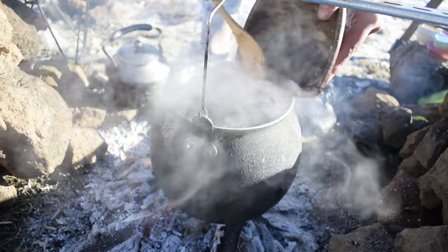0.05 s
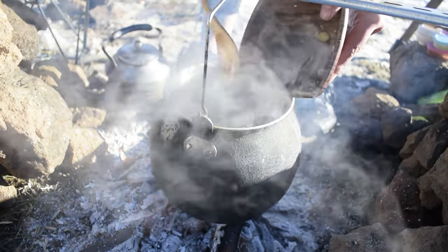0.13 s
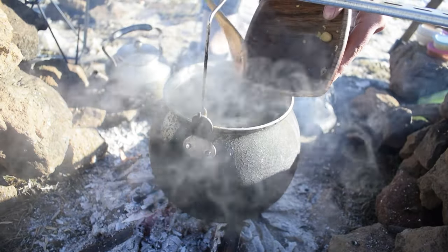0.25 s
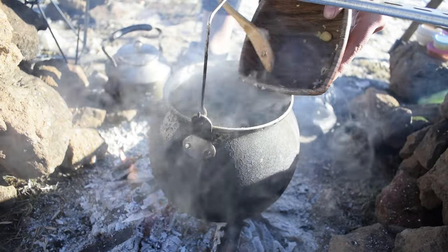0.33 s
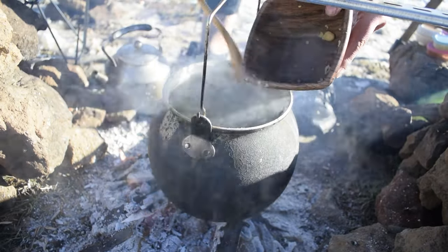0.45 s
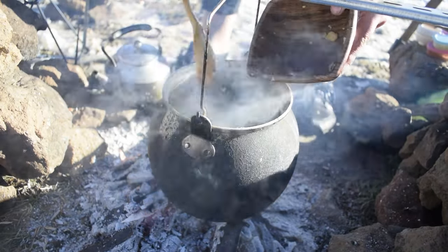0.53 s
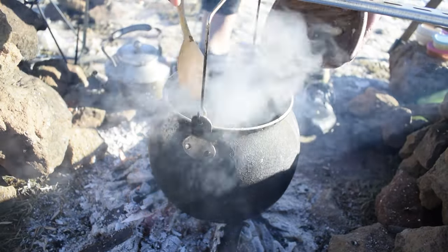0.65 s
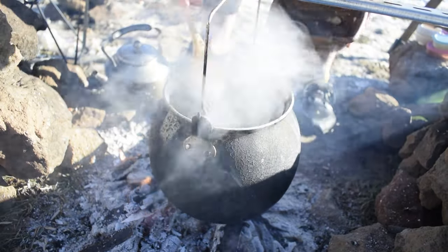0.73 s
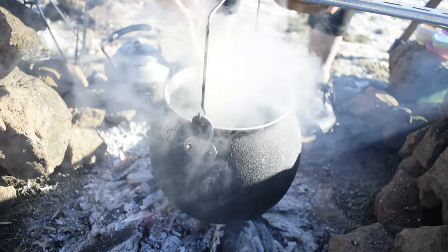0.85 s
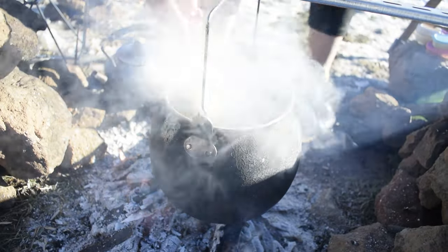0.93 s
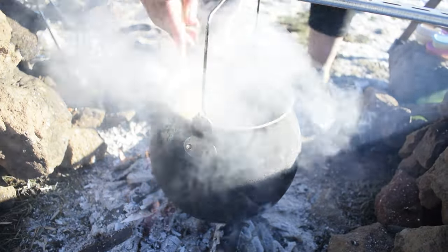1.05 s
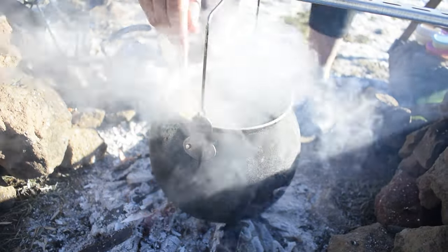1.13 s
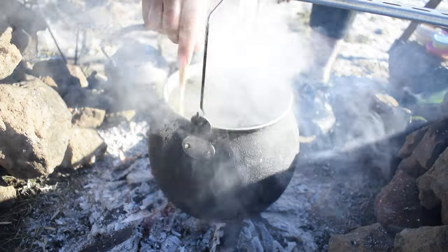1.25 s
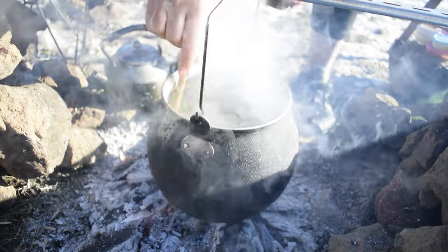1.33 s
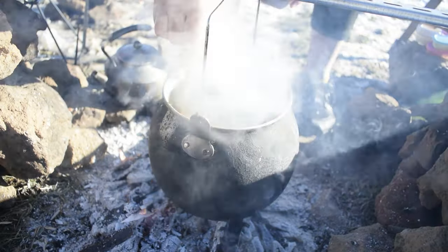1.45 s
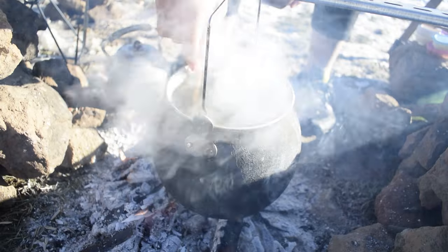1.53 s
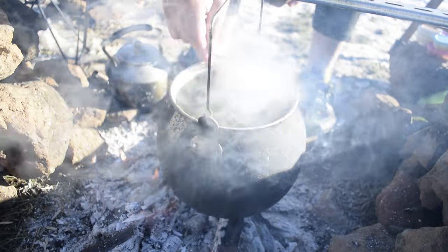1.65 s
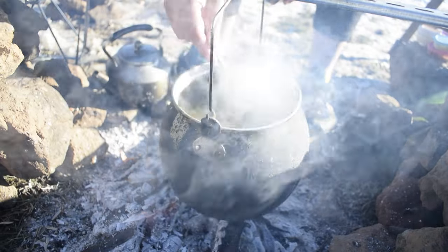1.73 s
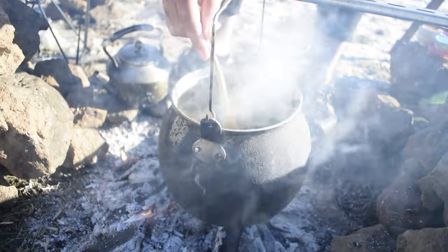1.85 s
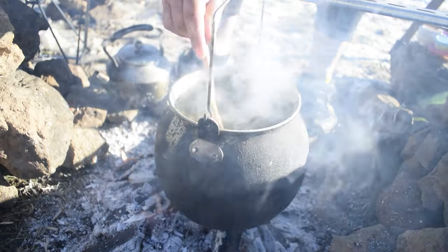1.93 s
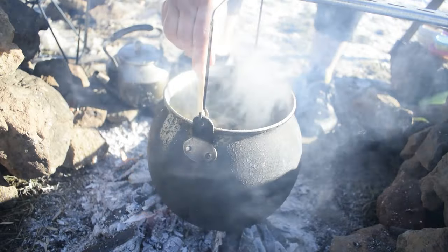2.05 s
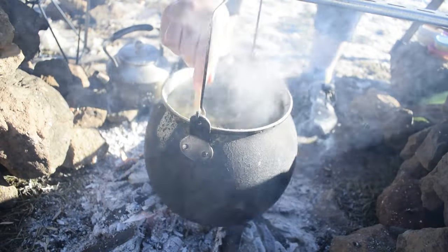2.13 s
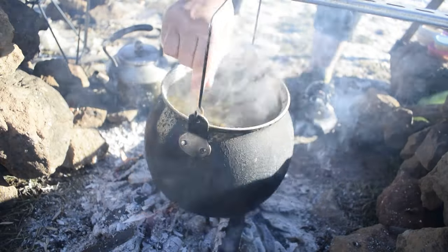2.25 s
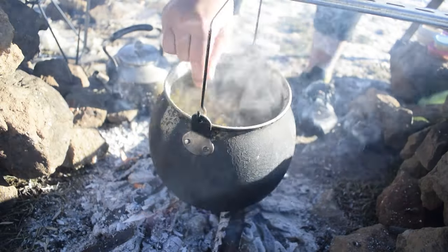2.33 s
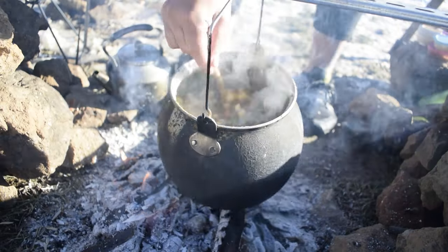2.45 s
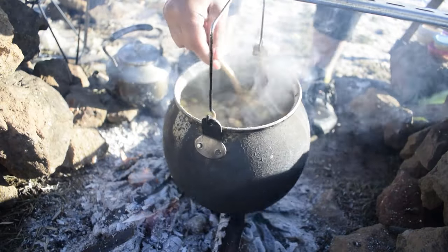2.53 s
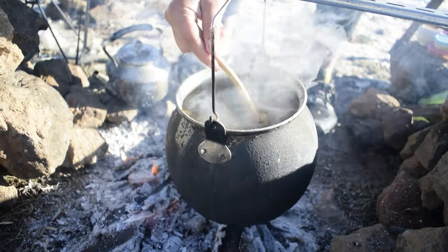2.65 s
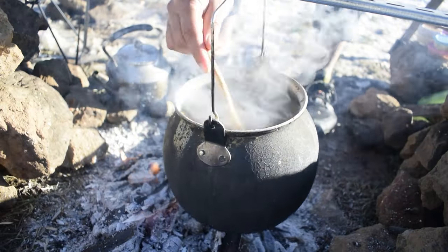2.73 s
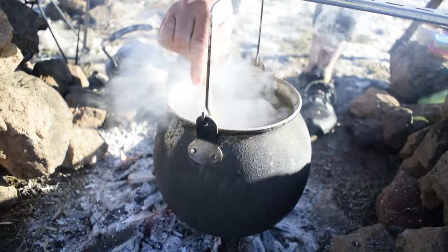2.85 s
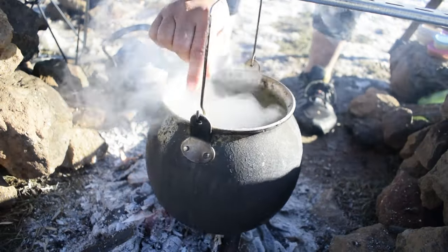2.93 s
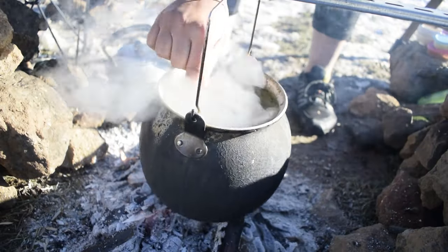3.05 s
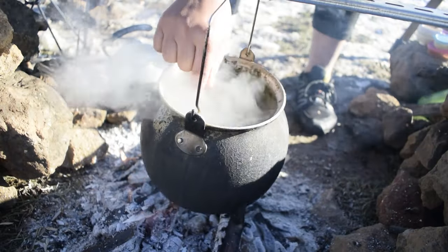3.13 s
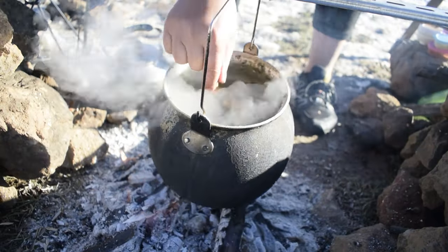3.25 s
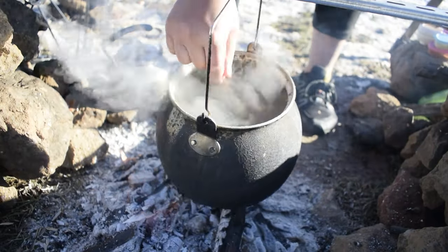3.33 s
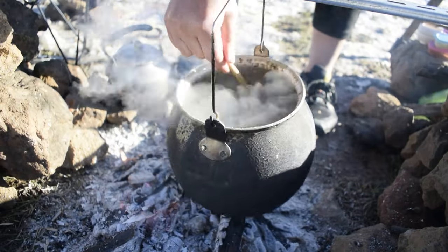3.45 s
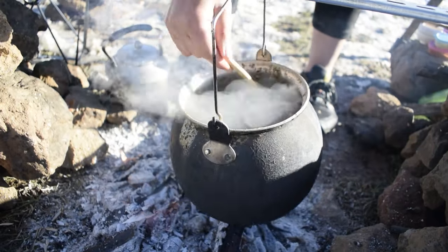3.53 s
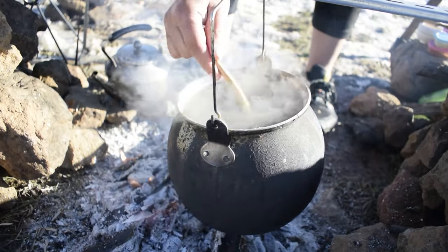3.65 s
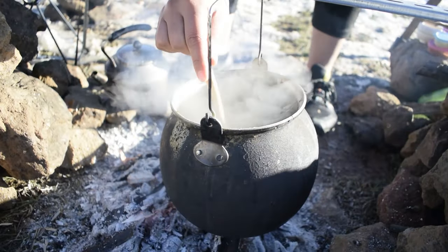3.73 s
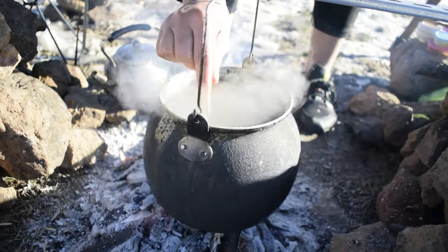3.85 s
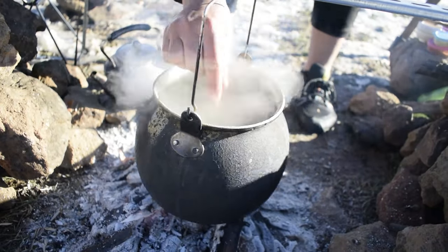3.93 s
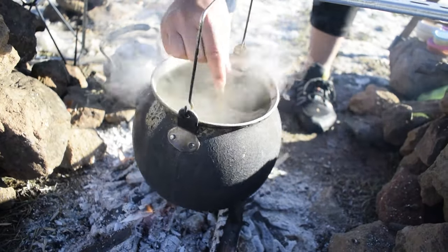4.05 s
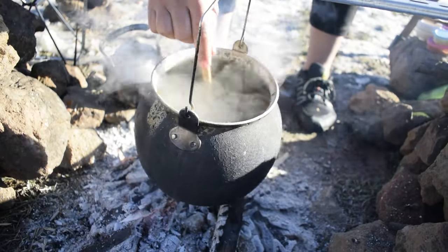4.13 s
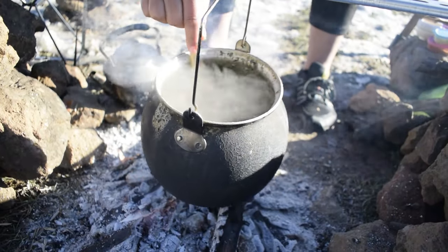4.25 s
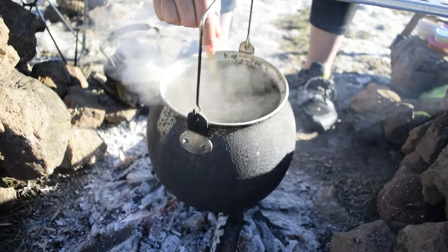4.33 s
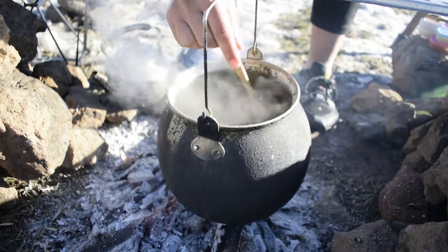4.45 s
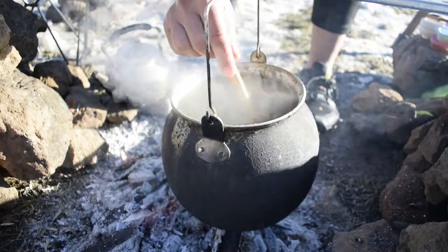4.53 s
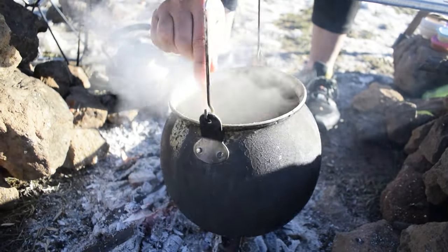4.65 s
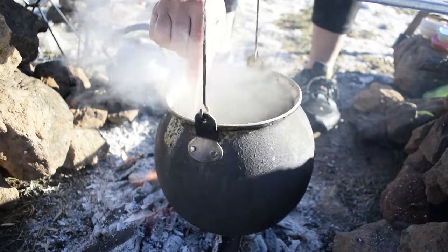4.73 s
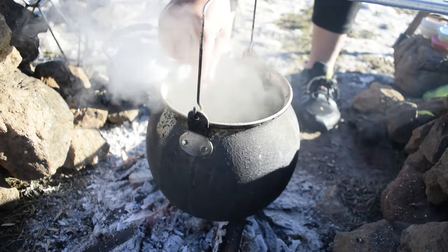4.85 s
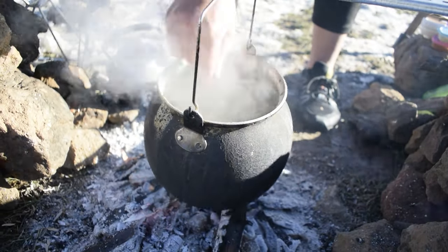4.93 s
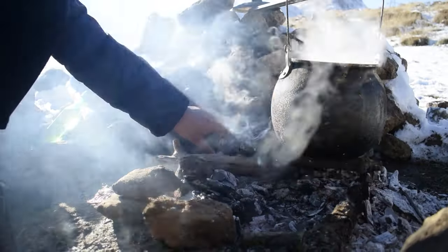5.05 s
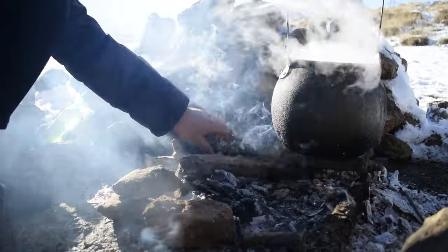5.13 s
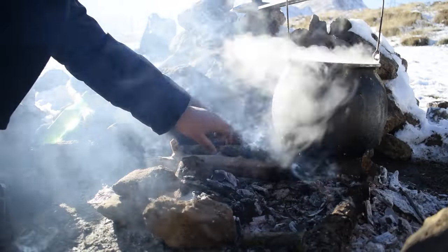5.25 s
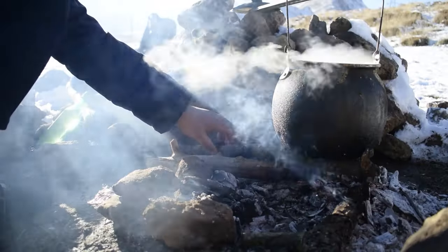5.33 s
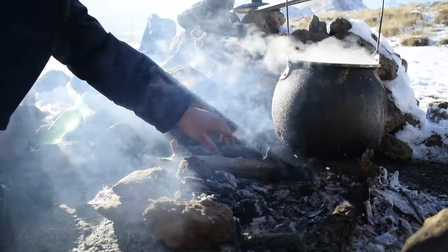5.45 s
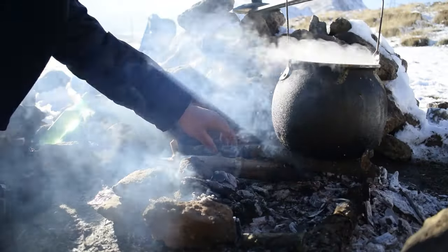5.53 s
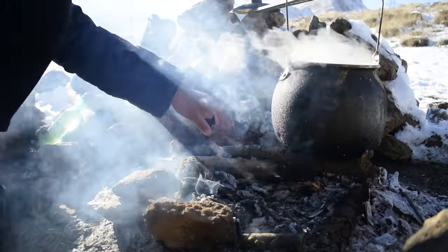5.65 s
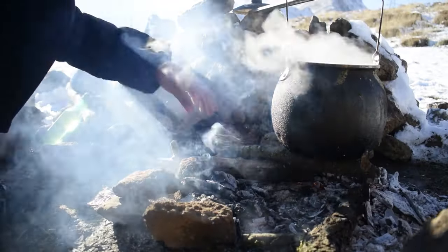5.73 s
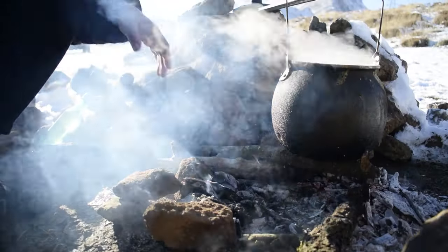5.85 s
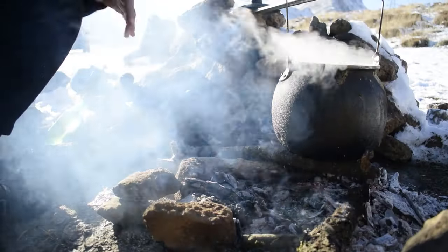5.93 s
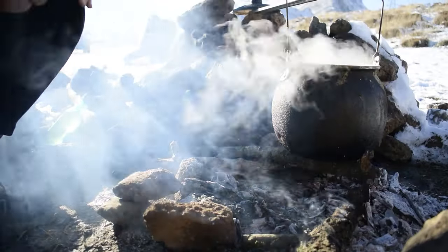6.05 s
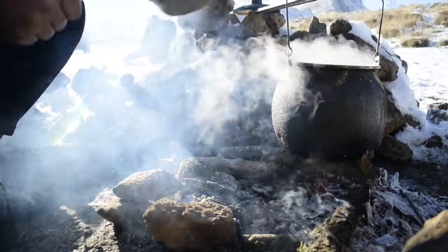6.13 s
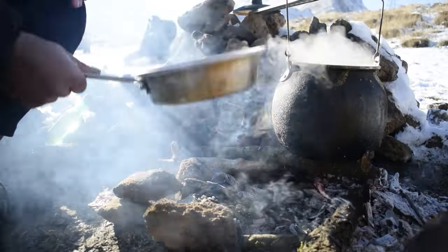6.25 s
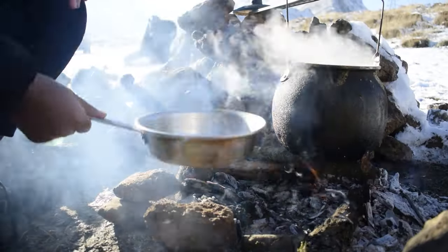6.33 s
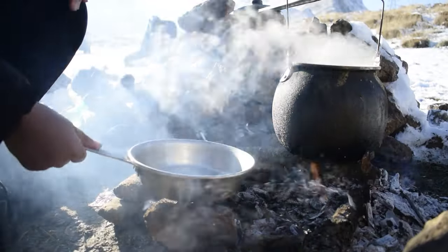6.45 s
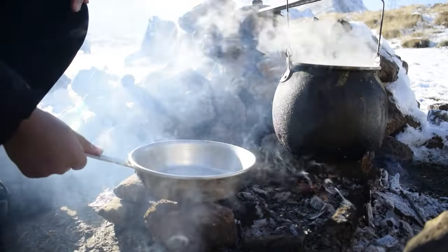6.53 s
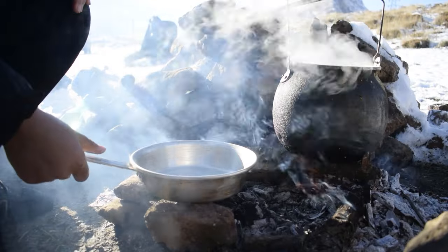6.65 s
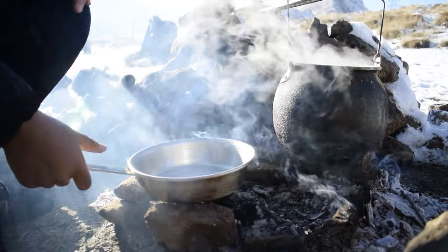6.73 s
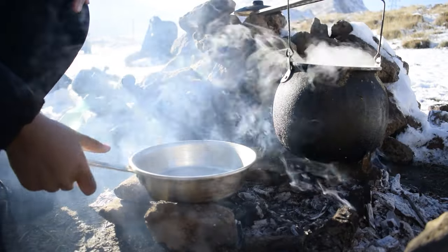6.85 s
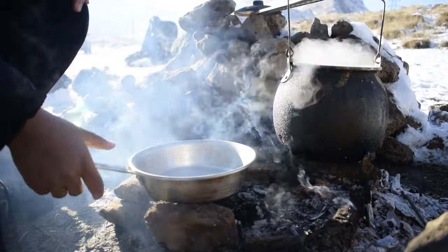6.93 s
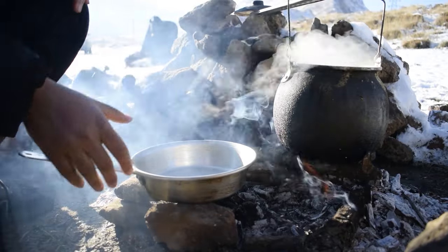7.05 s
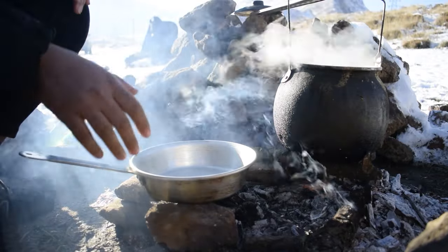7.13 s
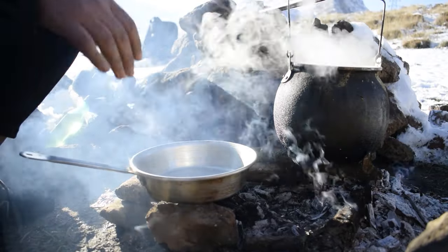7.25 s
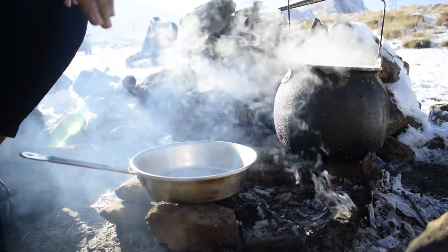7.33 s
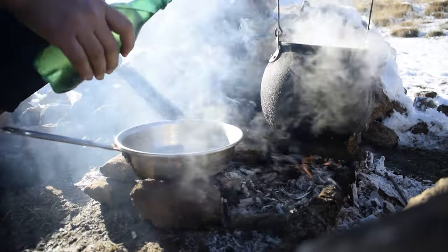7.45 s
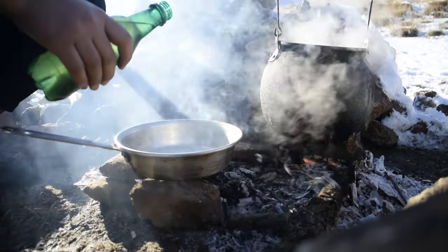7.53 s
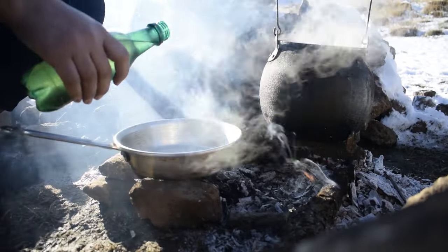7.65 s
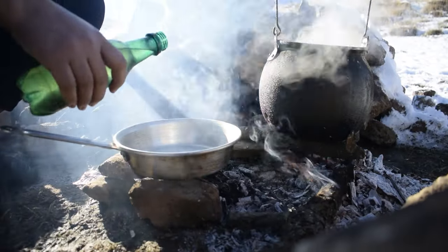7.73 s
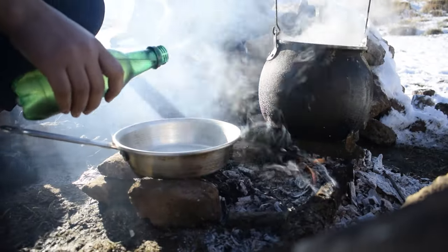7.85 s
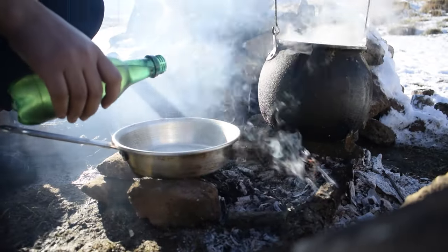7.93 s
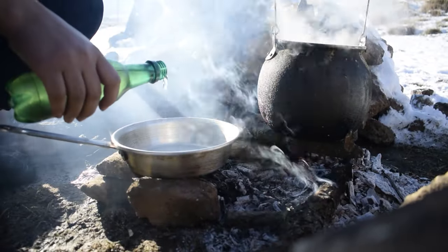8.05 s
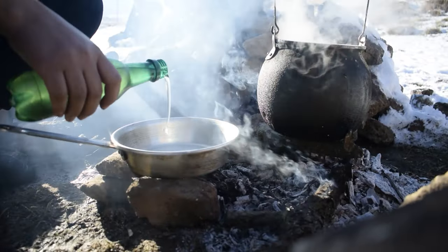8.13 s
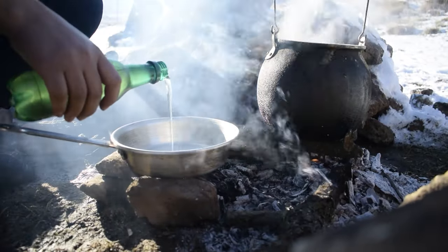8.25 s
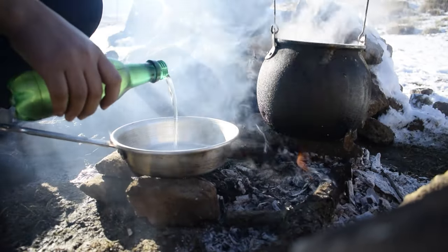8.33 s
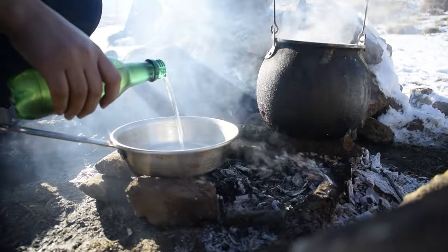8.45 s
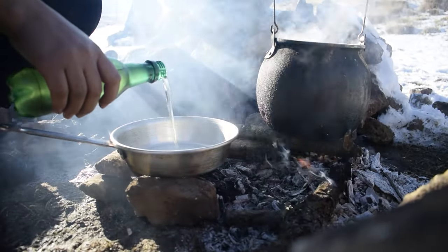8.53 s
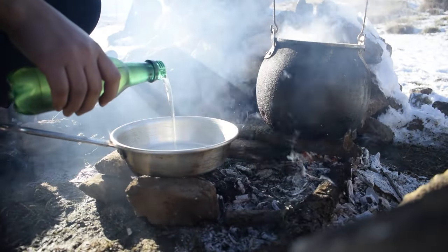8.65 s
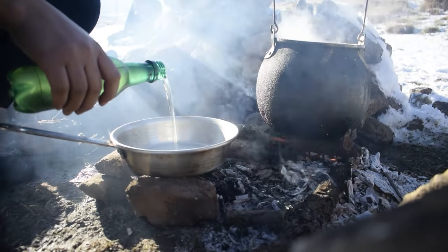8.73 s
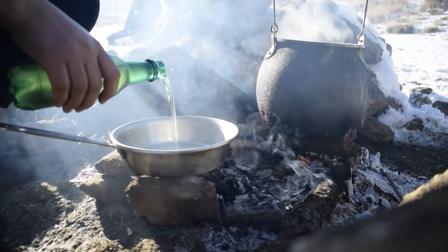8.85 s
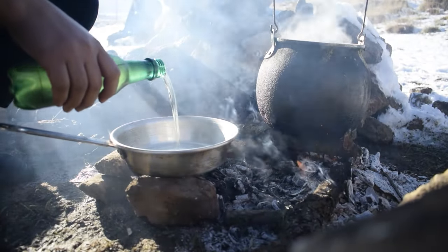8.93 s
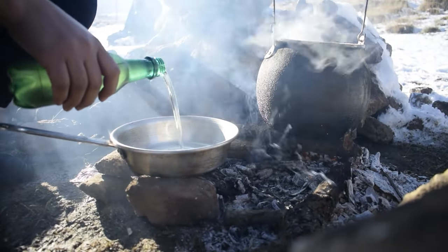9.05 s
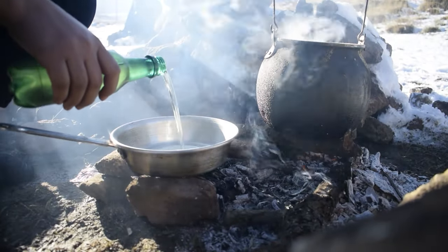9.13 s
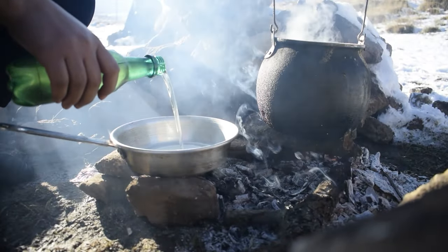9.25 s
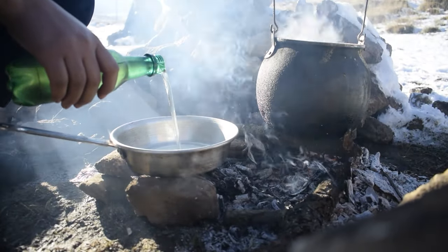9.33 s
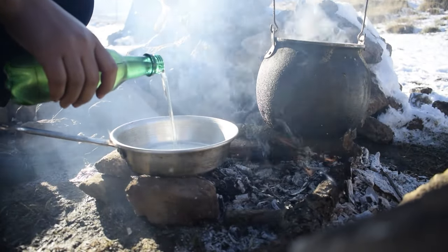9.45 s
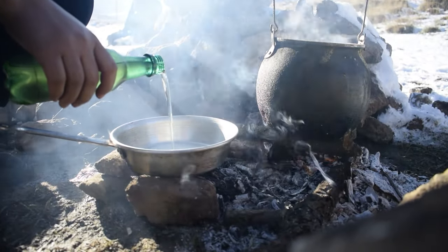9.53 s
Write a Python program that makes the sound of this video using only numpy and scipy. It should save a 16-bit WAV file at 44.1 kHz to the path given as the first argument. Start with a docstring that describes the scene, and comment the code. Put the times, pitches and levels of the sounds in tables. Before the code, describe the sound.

Hollow wooden knocks and scrapes open over a low, dense simmer and ember hiss. After quiet stirring comes a tiny double metal squeak, then a sharp spoon tap on the pot rim. Cloth swishes, and a pan lands with a bright ringing clank, shifts in smaller knocks and is damped. Fire flutter, dull pops and small rising blips remain. Open air, close microphone, central, dry, faint hiss.

```python
"""In the open, a pot of stew boils over a wood fire: bubbles are swelling, dying tones, flames low flutter,
embers hiss and noise snaps, over a rumble of wind and fire. A wooden spoon scrapes out a wooden bowl, hits
the rim and stirs, ringing each as a set of modes. The pot's bail squeaks on its hook by stick and slip, a
sleeve swishes, a thin pan is set on stones and rocks to rest, its ring damped by each touch, and oil lands
in it. Late on come short blips gliding upward. Loud blows pull the gain down."""
import sys
import numpy as np
from scipy import signal
from scipy.io import wavfile
from scipy.ndimage import uniform_filter1d

SR = 44100
rng = np.random.default_rng(int(sys.argv[2]) if len(sys.argv) > 2 else 0)


def persist_wave(psi):
    """Save psi, clipped to +-1, as 16-bit WAV."""
    counts = np.round(np.clip(psi, -1, 1) * 32767).astype(np.int16)
    wavfile.write(sys.argv[1], SR, np.atleast_2d(counts).T)


N = 423360


def from_db(db):
    """Decibels to gain."""
    return 10 ** (np.asarray(db) / 20)


def rms_one(x):
    """Scale to rms 1."""
    return x / np.sqrt(np.mean(x ** 2) + 1e-20)


def in_time(rows):
    """Each column after the time, as a value per sample."""
    s, *columns = np.transpose(rows)
    return [np.interp(np.arange(N) / SR, s, column) for column in columns]


def drift(rate):
    """Slow chance of rms 1, wandering about rate times a second."""
    step = 40   # samples between computed points
    r = np.exp(-2 * np.pi * rate * step / SR)
    white = rng.standard_normal(N // step + 2002)
    slow = signal.lfilter([1], [1, -2 * r, r * r], white)[2000:]
    return np.interp(np.arange(N) / step, np.arange(len(slow)), rms_one(slow))


def ring(clicks, hz, t60):
    """One resonance: a unit click sets a sine of height 1 ringing, 60 dB down after t60 seconds."""
    r = 1000 ** (-1 / (t60 * SR))
    w = 2 * np.pi * min(hz, SR / 2.2) / SR
    return signal.lfilter([0, np.sin(w)], [1, -2 * r * np.cos(w), r * r], clicks + 1e-18)


def clicks_at(seconds, db):
    """A click of the given level at each time."""
    out = np.zeros(N)
    out[np.round(np.array(seconds) * SR).astype(int)] = from_db(db)
    return out


def random_clicks(per_s, spread_db):
    """Clicks at random times with random signs, their levels in dB spread exponentially."""
    sizes = from_db(spread_db * np.minimum(rng.exponential(1, N), 5))
    signs = rng.choice([-1, 1], N)
    return sizes * signs * (rng.random(N) < per_s / SR)


def grains(per_s, low_hz, high_hz, cycles, spread_db, count=14):
    """Random clicks dealt to resonators spread in pitch, each ringing a few cycles; rms 1."""
    clicks, dealt = random_clicks(per_s, spread_db), rng.integers(0, count, N)
    out = 0
    for k, hz in enumerate(np.geomspace(low_hz, high_hz, count)):
        once = ring(clicks * (dealt == k), hz, cycles / hz)
        out = out + hz * ring(once, hz, cycles / hz)   # rung twice, so that it swells before it dies
    return rms_one(out)


def blips(events, cycles, rise):
    """A swelling, dying tone for each event, its pitch gliding: up by the share rise at its loudest."""
    out = np.zeros(N + SR)
    for s, db, hz in events:
        u = np.arange(int(6 * cycles / hz * SR)) * hz / SR / cycles
        swell = np.e * 2 * u * np.exp(-2 * u)
        tone = np.sin(2 * np.pi * cycles * u * (1 + rise * u))
        at = round(s * SR)
        out[at:at + len(u)] += from_db(db) * swell * tone
    return out[:N]


def bursts(seconds, db, centres_hz, t60, width=0.87):
    """A dying puff of noise for each event, in a band from width times its centre to centre / width."""
    out, n = np.zeros(N + SR), round(.12 * SR)
    fade = 1000 ** (-np.arange(n) / SR / t60)
    for s, gain, hz in zip(seconds, from_db(db), centres_hz):
        band = [hz * width, min(hz / width, SR / 2.2)]
        sos = signal.butter(1, band, "band", fs=SR, output="sos")
        puff = signal.sosfilt(sos, rng.standard_normal(n) * fade)
        at = round(s * SR)
        out[at:at + n] += gain * puff / np.abs(puff).max()
    return out[:N]


def coloured(spectrum, patchy_db):
    """Half-octave bands of noise, each with its own level, flickering partly together; rms 1."""
    out, together, edges = 0, drift(25), 250 * 2 ** np.arange(0, 6.6, .5)
    white, (hz, db) = rng.standard_normal((2, N)), np.transpose(spectrum)
    for k, (low, high) in enumerate(zip(edges, edges[1:])):
        sos = signal.butter(2, [low, min(high, SR / 2.2)], "band", fs=SR, output="sos")
        band = signal.sosfilt(sos, white[k % 2])   # neighbours use different noise
        level_db = np.interp(np.log(low * high) / 2, np.log(hz), db)
        flicker_db = patchy_db * (together + 0.65 * drift(31))
        out = out + band * from_db(level_db + flicker_db)
    return rms_one(out)


def strokes_db(rows, edges_s):
    """Level of each movement, one row each; edges_s are the times to swell and to fade by 20 dB."""
    t, (s, hold_s, db) = np.arange(N) / SR, np.array(rows).T[:3, :, None]
    before, after = np.maximum(s - t, 0), np.maximum(t - s - hold_s, 0)
    return db - 20 * (before / edges_s[0] + after / edges_s[1])


def strokes(rows, edges_s):
    """Gain of the movement that is loudest at each moment."""
    return from_db(np.maximum(strokes_db(rows, edges_s).max(axis=0), -200))


def struck_and_dragged(modes, blows, drag_gain, slips_per_s):
    """Blows and the dense slips of a dragged contact ring the same body; a longer contact dulls the blow."""
    def body(force):
        return sum(from_db(db) * ring(force, hz, t60) for hz, db, t60 in modes)

    slips = rms_one(body(random_clicks(slips_per_s, spread_db=2.8) * from_db(2.5 * drift(40))))
    force = np.zeros(N)
    for s, db, contact_ms in blows:
        push = np.hanning(2 + max(round(contact_ms * SR / 1000), 1))
        at = round(s * SR)
        force[at:at + len(push)] += from_db(db) * push / push.sum()
    return body(force) / 2 + drag_gain * slips


def microphone_hiss():
    """Steady white noise, independent in the two microphones."""
    return from_db(-56) * rng.standard_normal((2, N))


def rumble(wind_db):
    """Wind and fire rumble: dense low grains whose level wanders slowly."""
    low = grains(300, 15.5, 114, cycles=8.7, spread_db=-1.5, count=7)
    return from_db(wind_db + 2.6 * drift(1.3)) * low


def flames(flame_db):
    """Flames flutter as low grains of unsteady level, with single puffs as short low tones."""
    # flame puffs: t/s, peak level/dB, pitch f/Hz
    flame_puffs = [(2.925, -31, 229), (3.143, -25, 172), (3.326, -26, 223), (3.46, -26.5, 177),
                   (4.191, -25.5, 258), (4.925, -30.5, 222), (5.064, -20, 165), (5.129, -21.5, 195),
                   (5.267, -26, 144), (5.332, -27.5, 182), (5.941, -25.5, 155), (6.678, -24.5, 180),
                   (7.778, -28, 181), (8.236, -25, 133), (8.37, -23, 159), (8.457, -28, 153),
                   (8.592, -27.5, 168), (8.684, -24.5, 162), (8.874, -27, 176), (9.032, -26, 150),
                   (9.197, -31.5, 162), (9.316, -25, 162), (9.508, -25.5, 139)]
    flutter = grains(200, 132.0, 331, cycles=4.0, spread_db=0.5)
    flutter *= from_db(flame_db + 4.3 * drift(15.7))
    return flutter + blips(flame_puffs, cycles=0.81, rise=0.02)


def wood_pops(flame_db):
    """Sap pockets burst dully: low-passed clicks ring two short resonances."""
    # burning wood: t/s, click level before filtering/dB
    pop_events = [(4.885, -25), (7.819, -21.5), (7.907, -30), (8.387, -22), (8.428, -19.5), (8.448, -20.5),
                  (8.624, -21), (8.846, -22), (9.105, -21.5), (9.549, -27)]
    clicks = clicks_at(*np.transpose(pop_events))
    clicks += from_db(flame_db + 9) * random_clicks(70, spread_db=3.0)
    dull = signal.sosfilt(signal.butter(2, 1900, fs=SR, output="sos"), clicks)
    return ring(dull, 393, 0.0057) + from_db(-8.5) * ring(dull, 1000, 0.0049)


def embers(hiss_db):
    """Steam and embers hiss as flickering coloured noise; embers snap in dying noise bursts and tick."""
    # hiss spectrum: f/Hz, level per Hz/dB
    hiss_colour = [(530, -15), (900, -2), (1480, -2.5), (2080, -6.5), (6790, -6.5), (8150, -7.5),
                   (10400, -11), (13000, -15.5), (16000, -11)]
    # ember snaps: t/s, peak level/dB, centre f/Hz
    snap_events = [(0.0947, -4.5, 5100), (0.3, -31, 7350), (0.704, -25.5, 3300), (1.346, -31.5, 5360),
                   (1.487, -26.5, 6560), (1.672, -37, 7500), (2.3392, -24, 5670), (2.457, -28.5, 4000),
                   (2.5401, -22, 6800), (2.6203, -31, 12500), (3.1832, -28.5, 4100), (3.405, -25, 8700),
                   (3.6212, -28.5, 3740), (3.7, -26, 8200), (3.8025, -29.5, 3710), (3.8474, -29.5, 5800),
                   (4.611, -26.5, 5000), (4.7007, -32, 3780), (4.911, -34.5, 3380), (5.1363, -31, 8210),
                   (5.192, -32, 5180), (5.251, -29, 14200), (5.299, -25, 5860), (7.5436, -35, 6680),
                   (7.5697, -25.5, 6160), (7.8902, -20.5, 5400), (8.307, -28.5, 5800), (8.3713, -29, 7960),
                   (8.386, -23.5, 5800), (8.8784, -31.5, 7640)]
    s, db, hz = np.transpose(snap_events)
    out = from_db(hiss_db) * coloured(hiss_colour, patchy_db=1.55)
    out += bursts(s, db, hz, t60=0.011)
    # the brittle edge of each snap
    out += bursts(s, db + 1, 2.6 * np.minimum(hz, 6000), t60=0.0016, width=0.29)
    ticks = grains(220, 2800, 15300, cycles=12.0, spread_db=0.0)
    return out + from_db(hiss_db - 10.5) * ticks


def boiling_stew(boil_db):
    """Bubbles ring at their own pitch: two dense layers of grains, and big bubbles gliding upward."""
    # big bubbles: t/s, peak level/dB, pitch f/Hz
    big_bubbles = [(0.147, -15.5, 580), (0.499, -25, 557), (0.773, -27, 573), (0.805, -27, 606),
                   (0.826, -22.5, 526), (0.862, -26, 634), (1.107, -25, 587), (1.127, -19, 630),
                   (1.225, -25.5, 585), (1.409, -28, 590), (1.567, -24.5, 619), (1.865, -26.5, 716),
                   (2.921, -23.5, 514), (4.492, -28, 570), (6.071, -23.5, 616), (6.384, -24, 640),
                   (7.819, -24.5, 400), (7.974, -28.5, 695), (8.06, -29, 496), (8.385, -25, 392), ]
    simmer = from_db(boil_db) * grains(600, 470, 807, cycles=7.04, spread_db=3.0)
    fizz = from_db(boil_db - 16) * grains(600, 980, 2220, cycles=9.1, spread_db=3.0)
    return simmer + fizz + blips(big_bubbles, cycles=1.47, rise=0.095)


def sleeve():
    """Rubbing cloth makes patchy broadband noise that swells and fades with each movement."""
    # sleeve movements: full speed t/s, hold/s, level/dB
    swish_moves = [(6.13, .16, -31.5), (7.27, 0.04, -33), (7.38, 0.068, -43.5)]
    # cloth spectrum: f/Hz, level per Hz/dB
    cloth_colour = [(300, -8), (700, -3.5), (1580, 2), (3500, -5), (7630, -8.5), (11000, -20), (16000, -26)]
    return strokes(swish_moves, edges_s=(0.24, 0.2)) * coloured(cloth_colour, patchy_db=1.85)


def late_blips():
    """Short, pitched blips glide upward as they swell and die, some along with the wood pops."""
    # blips: t/s, peak level/dB, pitch f/Hz
    blip_events = [(8.299, -37, 705), (8.449, -33.5, 820), (8.624, -31.5, 686), (8.844, -37, 775),
                   (9.37, -30, 740)]
    return blips(blip_events, cycles=4.1, rise=0.073)


def bail_squeak():
    """Steel sticks and slips on steel at a steady rate; a firm grip is sharper, overtones waver most."""
    # two slips of the bail: full grip t/s, hold/s, level/dB, pitch f/Hz
    bail_slips = [(2.808, 0.018, -15, 1812), (2.862, 0.012, -16, 1792)]
    # harmonics: multiple of the pitch, relative level/dB
    harmonics = [(1, 4), (2, -4), (3, -5.5), (4, -14), (5, -24), (6, -31), (7, -40), (8, -41)]
    sharpness_at_full_db, sharpness_follows = 1.5, 0.4   # per overtone; share of any drop in level
    settle_samples = round(0.0037 * SR)   # the grip settles over 3.7 ms

    slips_db = strokes_db(bail_slips, edges_s=(.014, 0.043))
    slip_hz = np.array(bail_slips)[slips_db.argmax(axis=0), -1]
    db = uniform_filter1d(slips_db.max(axis=0), size=settle_samples)
    hz = uniform_filter1d(slip_hz, size=settle_samples)
    sharp_db = sharpness_at_full_db + sharpness_follows * (db - db.max())
    phase = 2 * np.pi * np.cumsum(hz * (1 + 0.0045 * drift(40))) / SR
    tones = 0
    for k, level_db in harmonics:
        waver_db = min(k - .6, 2) * 1.5 * drift(70) + 1.5 * drift(300)
        tone_db = level_db + min(k - 1, 3) * sharp_db + waver_db
        tones = tones - from_db(tone_db) * np.cos(k * phase)
    return from_db(db) * tones


def bowl_scraping():
    """The spoon strikes and drags on the wooden bowl's modes; soft touches ring briefly, gliding down."""
    # blows: t/s, push level/dB, contact/ms
    bowl_hits = [(0.025, 9, .1), (0.383, 9.5, .1)]
    # drags: full contact t/s, hold/s, level/dB
    bowl_scrapes = [(.032, 0.0044, -13), (.055, 0.067, -21), (.112, 0.016, -19), (.15, 0.177, -47),
                    (.421, 0.037, -24)]
    # bowl modes: f/Hz, relative level/dB, t60/s
    bowl_modes = [(1073, -19.5, 0.22), (1260, -0.5, 0.018), (1700, -6, 0.018), (2000, -12, 0.0065),
                  (2540, -21, 0.041), (3200, -17.5, 0.0075), (3540, -16, 0.01), (4630, -13.5, 0.006),
                  (6000, -25, 0.0024), (7950, -34, 0.0059)]
    # soft touches: t/s, peak level/dB, pitch f/Hz, cycles rung
    soft_touches = [(0.029, -8, 1077, 7.6), (0.044, -6, 1120, 5.2), (0.055, -9.5, 1016, 9.8),
                    (0.119, -11, 1070, 5.4), (0.341, -15, 1095, 5.5), (.388, 2.5, 1047, 5.5),
                    (.434, -6.5, 1095, 10), (.453, -6, 995, 9.9)]
    drag_gain = strokes(bowl_scrapes, edges_s=(0.0078, 0.024))
    out = struck_and_dragged(bowl_modes, bowl_hits, drag_gain, slips_per_s=5000)
    for s, db, hz, cycles in soft_touches:
        out += blips([(s, db, hz)], cycles=cycles, rise=-0.0017)
    s, db, hz, _ = np.transpose(soft_touches)
    out += blips(zip(s, db - 9.5, 1.53 * hz), cycles=4.2, rise=-.002)   # second mode of each touch
    return out + bursts(s, db - 18, 2.34 * hz, t60=0.052, width=0.92)


def rim_blow():
    """The spoon hits the pot rim in close contacts and drags on it, ringing the rim's modes."""
    # contacts: t/s, push level/dB, contact/ms
    rim_hits = [(4.291, -3.5, 0.087), (4.292, -12, 0.16), (4.297, -7.5, 0.085), (4.342, -31, 0.12)]
    # drag: full contact t/s, hold/s, level/dB
    rim_scrape = [(4.292, .055, -24.5)]
    # rim modes: f/Hz, relative level/dB, t60/s
    rim_modes = [(619, 5, 0.015), (1377, -3.5, 0.046), (2020, -1, 0.0076), (2690, -1.5, 0.011),
                 (3050, -2.5, .012), (3580, -7, 0.0071), (4320, -3, 0.029), (5100, -0.5, 0.012),
                 (6130, -6, 0.012), (6900, -9, .005), (7740, -2, 0.0045), (10500, -17, 0.0013)]
    drag_gain = strokes(rim_scrape, edges_s=(0.0078, 0.024))
    return struck_and_dragged(rim_modes, rim_hits, drag_gain, slips_per_s=6000)


def stirring():
    """The spoon rubs the wall under the stew, slipping on heavily damped modes, and ticks against it."""
    # rubs: full contact t/s, hold/s, level/dB
    wall_rubs = [(2.36, 0.21, -47), (3.22, 0.035, -43), (3.67, .18, -52), (4.14, 0.033, -42.5),
                 (4.37, 0.046, -45), (4.6, 0.062, -46.5), (4.96, 0.064, -46.5)]
    # damped modes of the wet wall: f/Hz, relative level/dB, t60/s
    wet_modes = [(1530, -6.5, 0.01), (1705, -9, 0.019), (2380, -1, 0.0044), (4100, 5, 0.0011),
                 (7900, -5.5, 0.0032)]
    # spoon on pot wall: t/s, peak level/dB, pitch f/Hz
    wall_ticks = [(0.7038, -39, 1670), (1.0703, -39.5, 1820), (3.674, -35.5, 1720), (3.8137, -38.5, 1680),
                  (4.1755, -35.5, 1370), (4.2098, -41, 1370), (4.4064, -36.5, 1490), (4.6104, -36, 2710),
                  (4.9781, -41, 1400)]
    rub_gain = strokes(wall_rubs, edges_s=(0.053, .07))
    rubs = struck_and_dragged(wet_modes, [], rub_gain, slips_per_s=3000)
    return rubs + blips(wall_ticks, cycles=10.3, rise=0.005)


def spoon():
    """All the spoon's contacts; small bodies radiate no bass."""
    contacts = bowl_scraping() + rim_blow() + stirring()
    return signal.sosfilt(signal.butter(2, 320, "high", fs=SR, output="sos"), contacts)


def handle_rattle():
    """The pan handle rattles at its rivets: irregular slips ring its short high modes."""
    # rattles: full strength t/s, hold/s, level/dB
    rattle_moves = [(5.97, 0.02, -40), (6.63, 0.03, -44), (6.77, 0.009, -37.5), (6.95, 0.0078, -45)]
    # handle modes: f/Hz, relative level/dB, t60/s
    handle_modes = [(4800, 0, 0.011), (7400, -2, 0.018), (8660, 0, .015), (12900, -4, .008)]
    rattle_gain = strokes(rattle_moves, edges_s=(0.035, 0.02))
    return struck_and_dragged(handle_modes, [], rattle_gain, slips_per_s=720)


def pan_wall(s, ring_db, bright_db, kept):
    """Each mode of the pan wall rings on as a turning, shrinking state that every touch damps and pushes."""
    # free wall, the low modes in beating pairs: f/Hz
    wall_hz = [1193, 1201, 1720, 1726.5, 2531, 3155, 3506, 4221, 4646, 5900, 6024, 7289, 7660]
    # the way a blow first swings each mode: sign
    wall_signs = [1, 1, 1, -1, 1, 1, 1, 1, 1, 1, 1, 1, 1]
    # wall modes: relative level/dB, t60/s
    wall_modes = [(2.5, 0.65), (-7, 0.61), (-3.5, 0.69), (-21.5, 1.78), (-11, 0.93), (-11.5, 0.39),
                  (-12, 0.42), (-21, 0.21), (-15, 0.31), (-12, 0.15), (-26, 0.17), (-10, 0.077),
                  (-9.5, 0.072)]
    out, at = np.zeros(N), np.round(s * SR).astype(int)
    for hz, sign, (db, t60) in zip(wall_hz, wall_signs, wall_modes):
        state = 0
        pole = 1000 ** (-1 / (t60 * SR)) * np.exp(2j * np.pi * hz / SR)
        pushes = from_db(ring_db + db + bright_db * np.log2(hz / 1200))
        # higher modes lose more to a touch
        shares = np.clip(kept, 0, 1) ** ((hz / 1200) ** 0.31)
        for start, stop, push, share in zip(at, [*at[1:], N], pushes, shares):
            # a push weaker than the ring already there lands a quarter cycle from it
            turn = 1j * state / abs(state) if abs(state) > push else 1
            first = share * state + sign * push * turn
            swing = first * pole ** np.arange(min(stop - start, SR) + 1)   # one second at most
            out[start:start + len(swing) - 1] += swing[:-1].imag
            state = swing[-1]
    return out


def pan():
    """Each touch of stone or oil knocks the base, thuds, grates, rings the wall and damps its old ring."""
    # pan on stone; the last two rows are oil landing in the pan, then damping its ring:
    # t/s, base knock level/dB, base pitch f/Hz, edge thud level/dB,
    # wall ring level at 1200 Hz/dB, brightness/dB per octave, share of ring kept at 1200 Hz
    pan_touches = [(5.947, -34, 723, -43, -50, 6, .9), (6.496, 0.5, 828, 6, -8.5, 1.5, .9),
                   (6.508, 3.5, 782, -20, -26, 2, 0.79), (6.745, -7, 785, -23, -33, 4, 0.79),
                   (6.866, -12.5, 874, 2, -15, -11.5, 0.18), (6.932, -4, 810, -25, -37.5, 7.5, 0.28),
                   (7.002, -38, 816, -2, -24, -5.5, 0.21), (7.005, -12.5, 780, -36, -57, -9, 0.85),
                   (7.041, -13, 827, -7, -29, -5, 0.3), (7.0807, -30, 784, -7, -31, -6.5, 0.26),
                   (7.085, -20, 862, -27, -68, -5, 0.55), (7.121, -25.5, 700, -18, -38.5, -2, 0.17),
                   (8.232, -53, 780, -27, -41.5, 1, .9), (8.305, -43, 780, -36, -55, 3, .3)]
    s, knock_db, knock_hz, thud_db, ring_db, bright_db, kept = np.transpose(pan_touches)
    knock = blips(zip(s, knock_db, knock_hz), cycles=7.7, rise=0.006)
    knock += blips(zip(s, knock_db - 13, 0.584 * knock_hz), cycles=2.5, rise=0.0022)
    # short upper modes of the base
    knock += blips(zip(s, knock_db - 20, 1493 + 0 * s), cycles=12.0, rise=.002)
    knock += blips(zip(s, knock_db - 15.5, 1780 + 0 * s), cycles=5.5, rise=.002)
    thud = blips(zip(s, thud_db, knock_hz), cycles=1.0, rise=0.051)
    # grit follows the strength of the touch at the grit's pitch
    grit_hz = 4460
    grit_db = ring_db + bright_db * np.log2(grit_hz / 1200) - 2.5
    grit = bursts(s, grit_db, grit_hz + 0 * s, t60=0.085, width=0.89)
    grit += bursts(s, grit_db + 11.5, 4000 + 0 * s, t60=0.0013, width=0.43)   # its sharp onset
    return knock + thud + grit + pan_wall(s, ring_db, bright_db, kept)


def scene():
    """All sources lie straight ahead, alike in both channels; each microphone adds its own faint hiss."""
    # boil and fire: t/s, boil level/dB, flame flutter level/dB,
    # steam and ember hiss level/dB, rumble of wind and fire level/dB
    fire_levels = [(0.0, -36.5, -50.5, -47, -52), (0.51, -39.5, -50, -50.5, -57),
                   (1.2, -39, -54, -46.5, -64), (2.35, -41.5, -49, -50, -52), (2.62, -41.5, -53, -45, -59),
                   (3.23, -42, -42.5, -51, -61), (3.58, -45.5, -50, -50, -58), (4.78, -45.5, -52, -50, -56),
                   (5.21, -47, -46, -48, -53), (5.78, -50.5, -43, -50, -47), (6.17, -43.5, -45, -42, -42),
                   (6.6, -45, -45, -45.5, -46), (6.92, -51, -44.5, -52, -61), (7.3, -45, -46.5, -48.5, -43),
                   (7.97, -46.5, -44.5, -49, -64), (8.61, -46.5, -41, -51, -52), (9.04, -46, -47, -52, -57),
                   (9.6, -46, -45, -50.5, -54)]
    boil_db, flame_db, hiss_db, wind_db = in_time(fire_levels)
    fire = rumble(wind_db) + flames(flame_db) + wood_pops(flame_db) + embers(hiss_db)
    pot = boiling_stew(boil_db) + bail_squeak()
    cooking = sleeve() + spoon() + handle_rattle() + pan()
    return microphone_hiss() + fire + pot + late_blips() + cooking


def record(dry):
    """Gain control ducks after loud peaks and creeps back; what still overloads clips; the top is cut."""
    limit_db, attack_s = -7, 0.0028
    excess_falls_db_per_s = 69   # the held excess; the gain moves by 0.8 of it
    over_db = np.maximum(20 * np.log10(np.abs(dry).max(axis=0) + 1e-9) - limit_db, 0)
    creep_db = excess_falls_db_per_s * np.arange(N) / SR
    held_db = np.maximum.accumulate(over_db + creep_db) - creep_db
    r = np.exp(-1 / (attack_s * SR))
    smooth_db = signal.lfilter([1 - r], [1, -r], held_db)
    clipped = np.clip(dry * from_db(-.8 * smooth_db), -1, 1)
    top_cut = signal.cheby2(18, 75, 16800, fs=SR, output="sos")   # 75 dB down from 16800 Hz up
    return signal.sosfilt(top_cut, clipped)


dry = scene()
out = record(dry)
persist_wave(out)
```